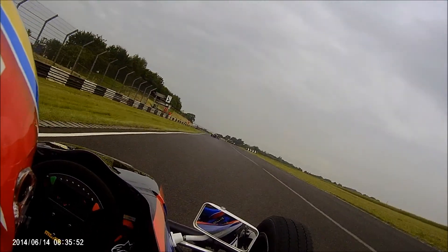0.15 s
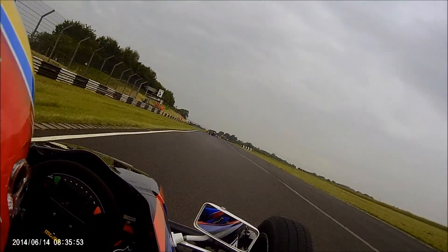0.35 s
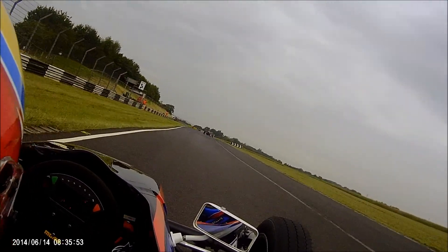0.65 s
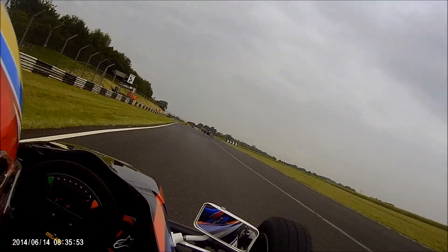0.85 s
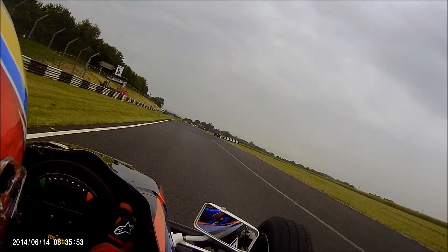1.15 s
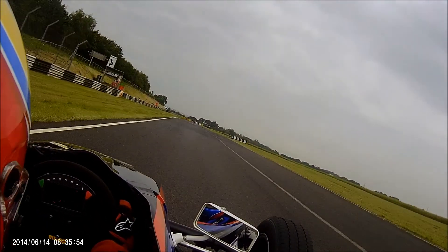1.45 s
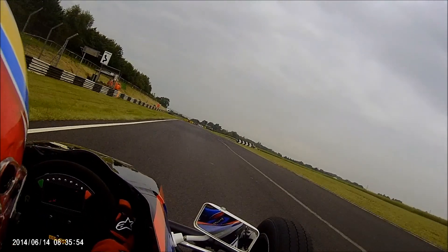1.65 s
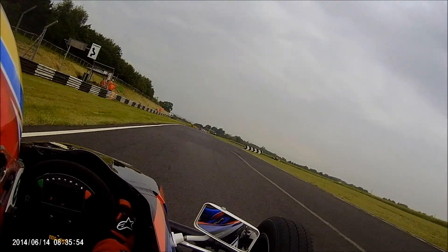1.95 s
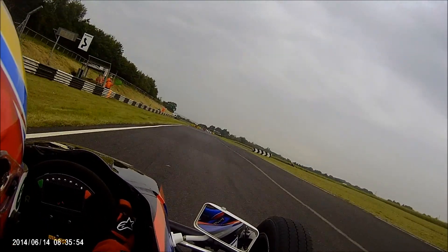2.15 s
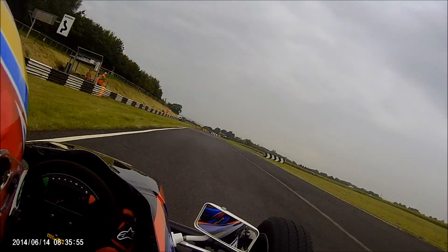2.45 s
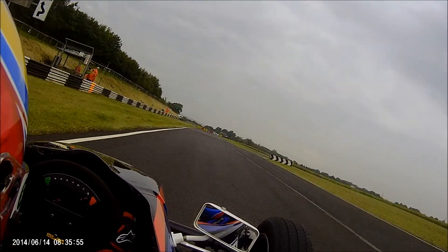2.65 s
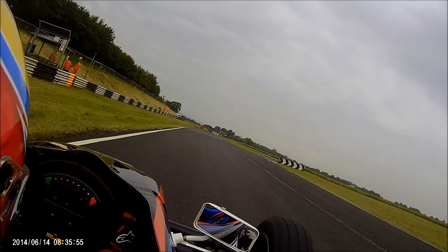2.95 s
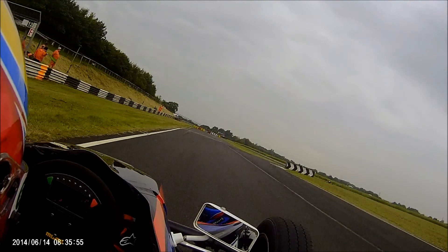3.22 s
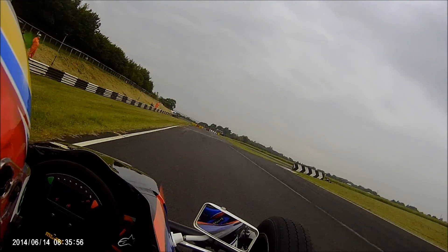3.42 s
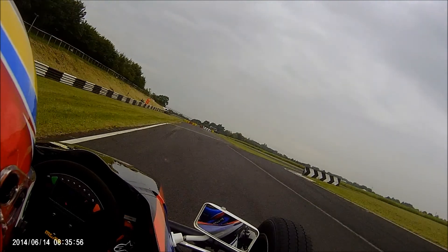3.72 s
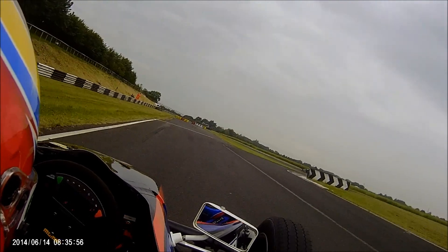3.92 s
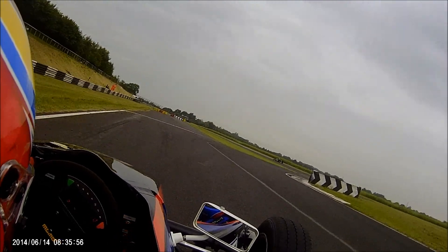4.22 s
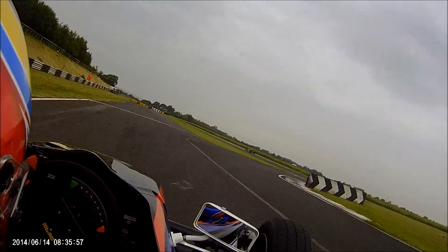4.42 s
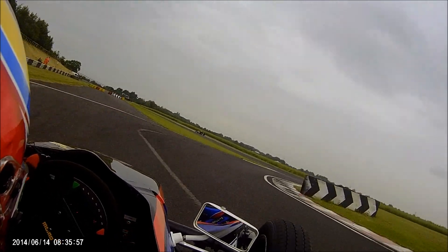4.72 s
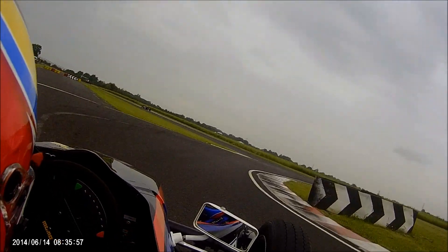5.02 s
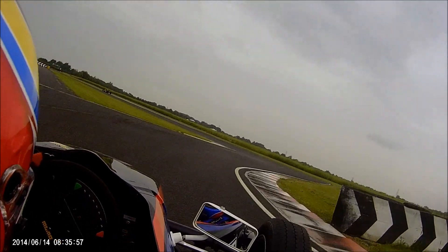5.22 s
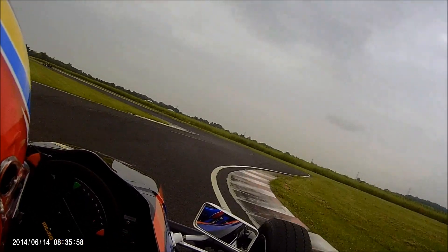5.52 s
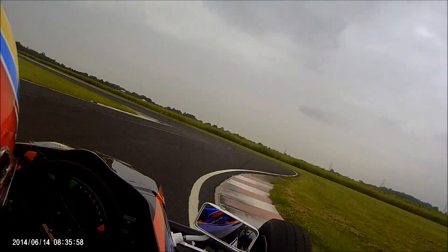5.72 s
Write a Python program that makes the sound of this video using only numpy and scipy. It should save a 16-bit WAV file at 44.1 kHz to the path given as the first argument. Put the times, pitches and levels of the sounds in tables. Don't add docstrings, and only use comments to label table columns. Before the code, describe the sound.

A race car engine drones close by, its buzzing pitch sagging steadily off the throttle, then just starting to pick up again at the end.

```python
import sys
import numpy as np
from scipy import signal
from scipy.io import wavfile

SR = 44100
rng = np.random.default_rng(int(sys.argv[2]) if len(sys.argv) > 2 else 0)


def voltage_ratio(level):
    return 10 ** (np.asarray(level, float) / 20)


def pcm_store(signal):
    levels = np.round(np.clip(np.atleast_2d(signal), -1, 1) * 32767)
    wavfile.write(sys.argv[1], SR, levels.astype(np.int16).T)


N = 258867
SLOW_HZ = 106


def evened(x):
    return x / np.sqrt(np.mean(x ** 2) + 1e-20)


def curve(rows, axis):
    rows = np.array(rows)
    return np.interp(np.arange(N) / SR, rows[:, 0], rows[:, axis])


def colour(x, points, modes):
    hz = np.fft.rfftfreq(16384, 1 / SR)
    slope_hz, slope_db = np.transpose(points)
    db = np.interp(np.log(hz + 1), np.log(slope_hz + 1), slope_db)
    db = db + sum(top / (1 + (2 * (hz - mid) / width) ** 2) for mid, width, top in modes)
    log_gain = np.log(voltage_ratio(np.r_[db, db[-2:0:-1]]))
    taps = np.fft.ifft(np.exp(np.conj(signal.hilbert(log_gain)))).real[:8192]
    return signal.oaconvolve(x, taps)[:N]


def coloured_noise(points):
    return colour(rng.standard_normal(N), points, [])


def wander(hz, count):
    coarse = rng.standard_normal((count, N // 128 + 402))
    lowpass = signal.butter(2, hz, fs=SR / 128, output="sos")
    smooth = evened(signal.sosfiltfilt(lowpass, coarse)[:, 200:-200])
    at = np.arange(N) / 128
    return np.array([np.interp(at, np.arange(len(row)), row) for row in smooth])


# time in seconds, firings a second in Hz.
SPEED = [(0.0, 140.2), (0.15, 138.6), (0.45, 136.2), (0.75, 133.0), (1.2, 128.7), (2.1, 120.9),
         (2.85, 116.9), (3.0, 115.2), (3.3, 114.1), (4.2, 107.9), (4.6, 106.7), (5.1, 105.4), (5.4, 105.9),
         (5.87, 108.3)]


def firing_hz():
    return curve(SPEED, axis=1)


def by_revs(db, db_per_hz):
    return db + db_per_hz * (firing_hz() - SLOW_HZ)


# time in seconds, swing in cycles, swings a second in Hz, length in seconds.
BUMPS = [
    (0.15, .014, 5.5, .1),
    (0.63, .004, 8., .35),
    (2.037, .009, 7.75, .42),
    (2.96, .016, 5.3, .17),
    (3.53, .004, 8.5, .2),
    (4.385, .008, 5., .3),
    (5.47, .006, 5.5, .25),
]


def shuffle():
    s, swing, hz, length = np.transpose(BUMPS)[:, :, None]
    t = np.arange(N) / SR - s
    return (swing * np.exp(-(t / length) ** 2) * np.cos(2 * np.pi * hz * t)).sum(0)


def crank():
    return np.cumsum(firing_hz()) / (4 * SR) + shuffle()


# time in seconds, shake in dB.
LOAD = [
    (0, -12.5),
    (.3, -13.5),
    (1.5, -12),
    (2.1, -14.5),
    (2.4, -13.5),
    (3.2, -16),
    (3.6, -15.5),
    (4.8, -18.5),
    (5.25, -21),
    (5.87, -18.5),
]
BLOWS = [
    (.05, .2),
    (.38, .5),
    (.575, 1.),
    (.83, .3),
]
# firings a second in Hz, even orders in dB, 21st order in dB.
EVEN = [(105.8, -1.5, -5.5), (107.3, 0.7, -4.5), (112, 3.5, -0.3), (114.3, -0.1, 1.2), (118.3, -4, 2.1),
        (125, -7, -4.5), (133.4, -10, -7), (135, -3.5, -1.6)]
STRONG = [2, 3, 11, 12, 17, 18, 19, 21, 22, 23, 24, 25, 41, 45]
STRONG_DB = [5.9, 3, 6.2, 2, 5, 2.5, 5.1, 11.64, 1, 4.4, 5.1, 2.5, 2.6, 1.6]
FAINT = [1, 7, 14, 16, 29, 33, 35, 38, 39, 40, 43, 44]
USUAL_DB, FAINT_DB = -0.65, -10
SLIP_PER_HZ = -.025


def shake(cycles, spread=.045, waver_db=1., slip=.45, trim_db=-17):
    multiple = np.setdiff1d(np.arange(1, 47), [4, 8])
    db = np.where(np.isin(multiple, FAINT), FAINT_DB, USUAL_DB)
    db[np.isin(multiple, STRONG)] = STRONG_DB
    multiple = multiple[:, None]

    place, strength = np.transpose(BLOWS)
    blows = strength * np.exp(-2j * np.pi * multiple * place)
    start = np.angle(blows.sum(1, keepdims=True))
    scatter = np.where(multiple > 15, spread, .5)
    start = start + 2 * np.pi * scatter * rng.standard_normal(multiple.shape)
    unlike = slip * (1 + by_revs(0, SLIP_PER_HZ)) * wander(12.0, len(db))
    phase = 2 * np.pi * multiple * cycles + start + unlike

    follow = np.clip(multiple / 14, .25, 1)
    level_db = db[:, None] + follow * (curve(LOAD, axis=1) + 14)
    revs, even_db, main_db = np.transpose(EVEN)
    high_even = (multiple % 2 == 0) & (multiple > 15)
    level_db = level_db + high_even * np.interp(firing_hz(), revs, even_db)
    level_db = level_db + (multiple == 21) * np.interp(firing_hz(), revs, main_db)
    tones = voltage_ratio(level_db + waver_db * wander(5, len(db))) * np.cos(phase)
    return voltage_ratio(trim_db) * tones.sum(0)


# frequency in Hz, gain in dB.
CLATTER_COLOUR = [(20, 0.5), (200, -0.1), (450, -2), (700, -2.5), (1000, 3), (3300, -1.23), (4500, -0.6),
                  (5100, -6), (5800, -0.05), (16000, 2)]
CLATTER_DB, CLATTER_DB_PER_HZ = -31.5, 0.2857


def clatter(cycles, per_firing=0.2, per_cycle=0.084, gust_db=0.72, trim_db=35):
    firing_swell = per_firing * np.cos(8 * np.pi * cycles - 1.5)
    cycle_swell = per_cycle * np.cos(2 * np.pi * cycles - 2.4)
    level_db = trim_db + by_revs(CLATTER_DB, CLATTER_DB_PER_HZ) + gust_db * wander(22, 1)[0]
    return voltage_ratio(level_db) * (1 + firing_swell + cycle_swell) * coloured_noise(CLATTER_COLOUR)


# frequency in Hz, gain in dB.
FRAME = [(15, -30), (40, -27), (110, -31.5), (200, -17), (330, -24.5), (450, -28.5), (900, -19),
         (1400, -23.5), (2200, -30), (3200, -35.5), (3800, -50.5), (5200, -45.5), (7000, -63),
         (16000, -84.5)]
# frequency in Hz, width in Hz, height in dB.
CASE = [(79, 9.8, 14.5), (240, 23, 2.5), (290.4, 9, 6), (616.8, 126, 17), (683, 34, -5.5), (740.3, 77, 15),
        (810, 29, 7.5), (1036, 29, 6), (1101, 51.6, 11.5), (1176.4, 18, 10), (1741, 159, 7), (1875, 59, 8),
        (2182, 74, 6), (2502, 90, -9), (2491, 76, 16), (2700, 100, 8.5), (3370, 160, 8), (3994, 210, 10.5),
        (4300, 120, -6.5), (4510, 200, 8), (5870, 240, 15), (6700, 220, 8), (8260, 300, 4), (9990, 330, 5),
        (11100, 350, 4), (12900, 300, 4)]


def ringing_case(cycles):
    return colour(shake(cycles) + clatter(cycles), FRAME, CASE)


# frequency in Hz, level in dB.
PIPE = [(105, -41.5), (114, -34.5), (122, -26), (140, -23), (212, -39.5), (221, -33), (228, -23.5),
        (281, -24.5)]


def exhaust(cycles, waver_db=.6):
    waver = waver_db * wander(12, 2)
    hz = firing_hz()
    pipe_hz, pipe_db = np.transpose(PIPE)
    first_db = np.interp(hz, pipe_hz, pipe_db) + waver[0]
    second_db = np.interp(2 * hz, pipe_hz, pipe_db) - 1.5 + waver[1]
    first = voltage_ratio(first_db) * np.cos(8 * np.pi * cycles + 0.3 * waver[1])
    second = voltage_ratio(second_db) * np.cos(16 * np.pi * cycles + 0.4 * waver[0])
    return np.sqrt(2) * (first + second)


# frequency in Hz, gain in dB.
ROAR_COLOUR = [(60, -27.5), (150, -5), (300, -1.5), (500, 7.5), (700, -16.5), (2000, -59), (16000, -89)]
ROAR_DB, ROAR_DB_PER_HZ = -36.5, 0.2942
ROAR_SHUT_DB, ROAR_SHUT_HZ = -17, 117
THROTTLE_S, THROTTLE_RISE_S = 5.1, .6


def roar():
    low = np.clip((ROAR_SHUT_HZ - firing_hz()) / (ROAR_SHUT_HZ - SLOW_HZ), 0, 1)
    shut = 1 - np.clip((np.arange(N) / SR - THROTTLE_S) / THROTTLE_RISE_S, 0, 1)
    level_db = by_revs(ROAR_DB, ROAR_DB_PER_HZ) + ROAR_SHUT_DB * low * shut
    return voltage_ratio(level_db) * evened(coloured_noise(ROAR_COLOUR))


# frequency in Hz, gain in dB.
TICK = [(1500, -26), (3000, -3.5), (4300, 6.5), (6500, -3), (8600, 3.5), (10000, -3.5), (12000, -9.5),
        (16000, -10)]
# frequency in Hz, width in Hz, height in dB.
TICK_RINGS = [(5010, 1100, 16), (8250, 350, 2), (9040, 300, 5.5), (9970, 320, 3), (11100, 270, -0.5),
              (12200, 350, 0)]
CYLINDER_DB = [0.5, 2.5, -8, -1]
TICK_DB, TICK_DB_PER_HZ = -67, 0.3666


def ticks(cycles, scatter_db=2., jitter_s=.0004, burst_db=1., stray_per_s=60, stray_db=-5, trim_db=8.5):
    stray = rng.random(N) < stray_per_s / SR
    hits = stray * voltage_ratio(stray_db + scatter_db * rng.standard_normal(N))

    firing = np.floor(4 * (cycles - .05))
    at = np.flatnonzero(np.diff(firing) > 0)
    luck = rng.standard_normal((len(at), 2))
    cylinder = firing[at + 1].astype(int) % 4
    late = (jitter_s * SR * luck[:, 1]).astype(int)
    hits[np.clip(at + late, 0, N - 1)] = voltage_ratio(np.array(CYLINDER_DB)[cylinder] + scatter_db * luck[:, 0])

    scrape = np.exp(-np.arange(80) / 4)
    hits = signal.oaconvolve(hits, scrape)[:N] * rng.standard_normal(N)
    level_db = trim_db + by_revs(TICK_DB, TICK_DB_PER_HZ) + burst_db * wander(11, 1)[0]
    return voltage_ratio(level_db) * evened(colour(hits, TICK, TICK_RINGS))


# frequency in Hz, gain in dB.
RUMBLE_COLOUR = [(15, -12), (45, -14), (90, -21.5), (170, -4), (230, 0.1), (290, -5), (400, -25.5),
                 (16000, -90)]


def rumble(level_db=-34, gust_db=1.5):
    return voltage_ratio(level_db + gust_db * wander(8, 1)[0]) * evened(coloured_noise(RUMBLE_COLOUR))


# time in seconds, peak level in dB.
KNOCKS = [(0.069, -27.5), (0.2452, -31), (0.2743, -29.5), (0.3336, -37.5), (0.392, -36.5), (0.415, -36.5),
          (0.48, -34.5), (0.5234, -36.5), (0.5388, -33.5), (0.666, -33), (0.823, -37), (0.906, -35),
          (1.0655, -33.5), (1.212, -35.5), (1.2508, -35), (1.277, -34), (1.3375, -35), (1.495, -39.5),
          (1.5908, -35), (1.8502, -37.5), (2.012, -37), (2.6296, -36.5), (2.799, -35), (3.1013, -41),
          (3.345, -42), (4.477, -35.5), (4.9082, -42), (5.0845, -40), (5.5578, -39.5), (5.761, -43)]


def knocks(trim_db=9):
    hits = np.zeros(N)
    s, db = np.transpose(KNOCKS)
    hits[np.minimum(np.round(s * SR).astype(int), N - 1)] = voltage_ratio(db + trim_db)
    return colour(hits, TICK, TICK_RINGS)


def scene():
    cycles = crank()
    engine = ringing_case(cycles) + exhaust(cycles) + roar()
    return (engine + ticks(cycles) + rumble() + knocks())[None]


def roll_off(x):
    return signal.sosfilt(signal.butter(12, 15830, fs=SR, output="sos"), x)


def record(dry):
    hiss_db, ceiling = -76.5, 0.9
    loud = dry + voltage_ratio(hiss_db) * rng.standard_normal(dry.shape)
    soft = loud / (1 + np.abs(loud / ceiling) ** 6) ** (1 / 6)
    return roll_off(soft)


dry = scene()
out = record(dry)
pcm_store(out)
```